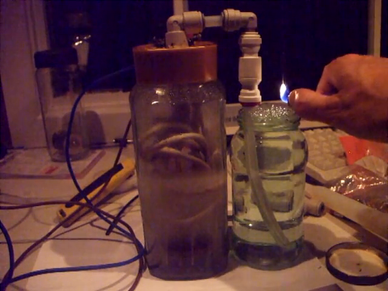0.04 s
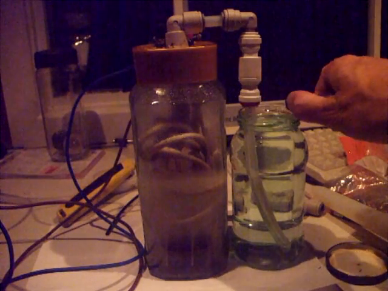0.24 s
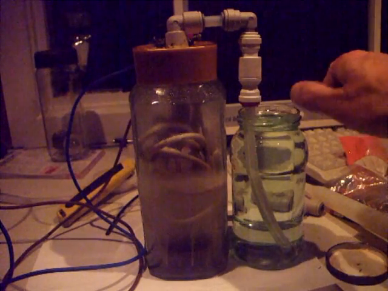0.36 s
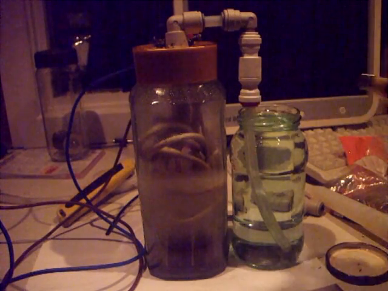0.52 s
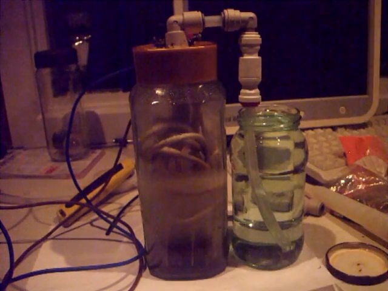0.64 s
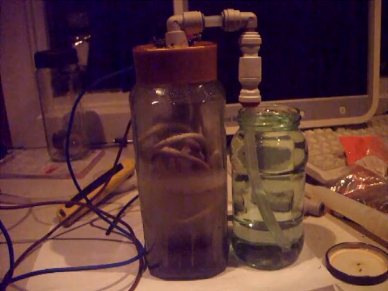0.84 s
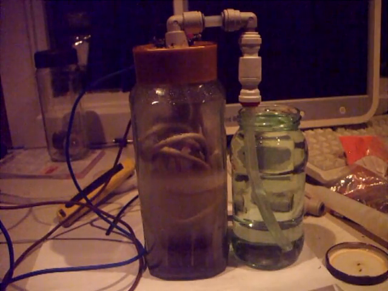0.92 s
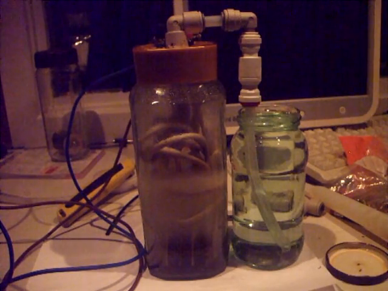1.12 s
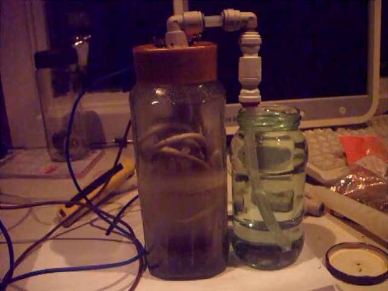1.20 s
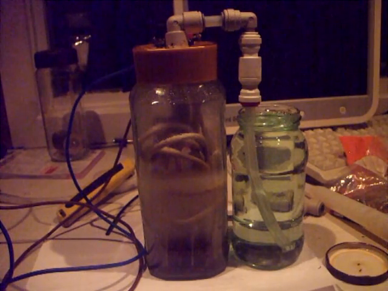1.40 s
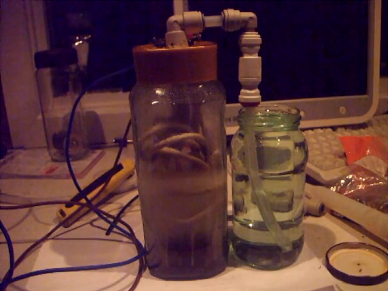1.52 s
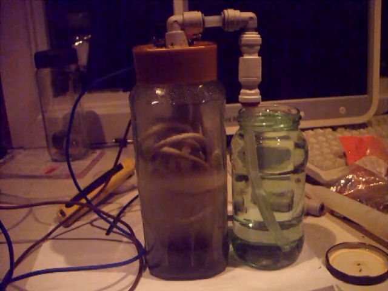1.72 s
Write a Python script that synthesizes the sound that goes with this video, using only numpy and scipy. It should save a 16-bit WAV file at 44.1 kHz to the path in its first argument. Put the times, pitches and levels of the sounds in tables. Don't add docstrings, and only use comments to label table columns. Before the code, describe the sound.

One loud, dry crack as a flame lights gas-filled foam, then a short room echo and hiss

```python
import sys
import numpy as np
from scipy import signal
from scipy.fft import rfft, irfft
from scipy.io import wavfile

SR = 44100
rng = np.random.default_rng(int(sys.argv[2]) if len(sys.argv) > 2 else 0)


def level_to_linear(level):
    exponent = np.asarray(level, float) / 20
    return 10 ** exponent


def wav_out(sig):
    wavfile.write(sys.argv[1], SR, np.round(np.clip(np.atleast_2d(sig).T, -1, 1) * 32767).astype(np.int16))


N = 77175
POP_S = 0.2419


def rms_one(x):
    return x / np.sqrt(np.mean(x ** 2) + 1e-20)


def at_hz(points, hz):
    points = np.array(points)
    return np.interp(np.log(hz), np.log(points[:, 0]), points[:, 1])


def since(s):
    return np.maximum(np.arange(N) / SR - s, 0)


def bump(middle_s, length_s):
    return np.exp(-((np.arange(N) / SR - middle_s) / length_s) ** 2)


def low_pass(x, hz):
    return signal.sosfilt(signal.butter(6, hz, fs=SR, output="sos"), x)


def coloured(spectrum):
    hz = np.maximum(np.arange(N // 2 + 1) * SR / N, 15)
    white = rfft(rng.standard_normal(N))
    return rms_one(irfft(white * level_to_linear(at_hz(spectrum, hz)), N))


def narrow(hz, width_hz):
    r = np.exp(-np.pi * width_hz / SR)
    b = [1, 0.0014, -1]
    a = [1, -2 * r * np.cos(2 * np.pi * hz / SR), r * r]
    once = signal.lfilter(b, a, rng.standard_normal(N))
    return rms_one(signal.lfilter(b, a, once))


def fan():
    # f/Hz, level/dB per Hz
    rush = [(40, -6.5), (150, -4.5), (300, -2), (600, -4.5), (1000, -6), (2000, -12), (5500, -12)]
    # f/Hz, width/Hz, level/dB
    whistles = [(155, 25, -66), (517, 30, -64), (1130, 90, -61)]
    out = level_to_linear(-49) * coloured(rush)
    for hz, width_hz, db in whistles:
        out = out + level_to_linear(db) * narrow(hz, width_hz)
    return out


def thin_air():
    # f/Hz, level/dB per Hz
    air_colour = [(30, 0.5), (60, -6), (200, -18.5), (2000, -25), (6000, -34), (8000, -43), (15000, -48)]
    air_db, side_db = -57, -20.5
    middle = level_to_linear(air_db) * coloured(air_colour)
    side = level_to_linear(air_db + side_db) * coloured(air_colour)
    return middle + side * np.array([[1], [-1]])


def bubbling():
    first_s, every_s, late_s = 0.026, 0.1525, 0.0017
    jar_hz, t60_s, rise_s = 618, 0.075, 0.005
    level_db, grow_db = -38.5, 4.0
    out = 0
    for k, (late, uneven) in enumerate(rng.standard_normal((12, 2))):
        t = since(first_s + k * every_s + late_s * late)
        db = level_db + grow_db * (abs(k - 4.5) / 6 - 0.5) + 0.5 * uneven
        envelope = level_to_linear(db - 60 * t / t60_s) * (1 - np.exp(-t / rise_s))
        out = out + envelope * np.sin(2 * np.pi * jar_hz * t)
    return out


def air_swells():
    # t/s, length/s, level/dB, f/Hz
    swells = [
        (0.11, .08, -56, 60),
        (0.656, 0.12, -53.5, 45.8),
        (1.002, 0.018, -49.5, 81),
        (1.094, 0.066, -46.5, 42.6),
        (1.308, .04, -66, 39.4),
    ]
    out = 0
    for s, length_s, db, hz in swells:
        out = out + level_to_linear(db) * bump(s, length_s) * narrow(hz, 0.44 * hz)
    return out


def blast():
    # delay/s, f/Hz, level/dB, t60/s
    rings = [
        (0.0000, 1600, 15, .006),
        (0.0007, 622, 10.5, .028),
        (0.0007, 320, 4.5, .04),
        (0.0000, 4800, -1, .025),
        (0.0007, 1100, -5, .02),
        (0.0004, 2450, -2, .015),
        (0.0070, 4600, 4, .012),
    ]
    out = 0
    for delay_s, hz, db, t60_s in rings:
        t = since(POP_S + delay_s)
        out = out - level_to_linear(db - 60 * t / t60_s) * np.sin(2 * np.pi * hz * t)
    return out


def fade(hz, t60_s):
    first_s, build_cycles = 0.0055, 0.58
    build = 1 - np.exp(-since(POP_S + first_s) * hz / build_cycles)
    return level_to_linear(-60 * since(POP_S) / t60_s) * build


def room():
    # f/Hz, level/dB per Hz
    answer = [(70, -16.5), (130, -13.5), (330, 1.5), (650, -4), (1100, -8), (2000, -15.5), (3500, -20),
              (5500, -19)]
    # f/Hz, t60/s
    decay = [(100, .31), (330, .29), (700, .265), (1800, .215), (4000, .19)]
    # f/Hz, level/dB
    modes = [(191, -31), (199, -32), (315, -26.5), (357, -26), (385, -30.5), (424, -33), (605, -30.5),
             (642, -35), (790, -31.5), (908, -33.5)]
    # f/Hz, level/dB, t60/s
    furniture = [(160, -64, 1.0), (381, -62, .8), (395, -65, .7), (518, -66, .9)]
    room_db, before_duck_db = -21, 32
    edges = 50 * 2 ** np.arange(0, 7, 1 / 3)
    white = rng.standard_normal((2, N))
    out = 0
    for k, (low, high) in enumerate(zip(edges, edges[1:])):
        hz = np.sqrt(low * high)
        band_filter = signal.butter(2, [low, high], "band", fs=SR, output="sos")
        band = signal.sosfilt(band_filter, white[k % 2])
        out = out + 6 * band * level_to_linear(room_db + at_hz(answer, hz)) * fade(hz, at_hz(decay, hz))
    ringing = [(hz, db, at_hz(decay, hz)) for hz, db in modes] + list(furniture)
    for (hz, db, t60_s), turn in zip(ringing, rng.random(20)):
        wave = np.sin(2 * np.pi * (hz * since(POP_S) + turn))
        out = out + level_to_linear(db) * fade(hz, t60_s) * wave
    return out * level_to_linear(before_duck_db)


def clicks():
    # t/s, level/dB, t60/s, centre f/Hz
    knocks = [
        (.643, -45, .02, 2500),
        (.6425, -62, .025, 9000),
        (.959, -61, .01, 9000),
        (.644, -45, .03, 600),
        (1.7302, -39, .02, 2500),
        (1.7300, -49, .04, 6400),
        (1.7300, -59, .04, 9000),
        (1.7395, -41, .018, 300),
    ]
    out = 0
    for s, db, t60_s, hz in knocks:
        onset = np.minimum(since(s) * 3000, 1)
        out = out + onset * level_to_linear(db - 60 * since(s) / t60_s) * narrow(hz, 0.7 * hz)
    return out


def squeak():
    return level_to_linear(-70) * bump(1.04, 0.05) * narrow(6600, 90)


def rustle():
    onset = np.minimum(since(1.741) / 0.0043, 1)
    return level_to_linear(-53) * onset * narrow(8500, 5000)


def camera(x):
    t = since(POP_S)
    duck_db, attack_s, bite, recover_db_per_s = 32, 0.0064, 4, 205
    ducking = 1 - np.exp(-(t / attack_s) ** bite)
    x = x * level_to_linear(-np.maximum(duck_db - recover_db_per_s * t, 0) * ducking)
    sag, sag_s, rebound, rebound_s = 0.42, 0.012, 0.14, 0.045
    swing = rebound * np.exp(-t / rebound_s) - sag * np.exp(-t / sag_s)
    x = x + (t > 0) * swing * (1 - np.exp(-t / 0.003))
    x = low_pass(x, 5000)
    step, bias_steps = 1 / 128, -0.1
    steps = np.zeros(N)
    steps[::4] = 4 * step * np.clip(np.floor(x[::4] / step + bias_steps), -128, 127)
    smooth = signal.firwin(161, 5350, window=("kaiser", 7), fs=SR)
    return signal.oaconvolve(steps, smooth, "same")


def second_track():
    small_sounds = air_swells() + clicks() + rustle() + squeak()
    return thin_air() + low_pass(small_sounds, 12000)


def scene():
    return camera(blast() + room() + bubbling() + fan()) + second_track()


def roll_off(x):
    return signal.sosfilt(signal.butter(12, 15500, fs=SR, output="sos"), x)


def record(dry):
    offsets = [-0.0025, 0.0029]
    mix = np.clip(dry + np.array(offsets)[:, None], -1, 1)
    return roll_off(mix)


dry = scene()
out = record(dry)
wav_out(out)
```